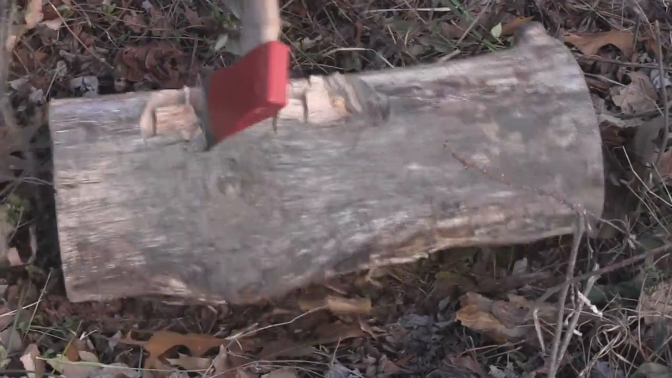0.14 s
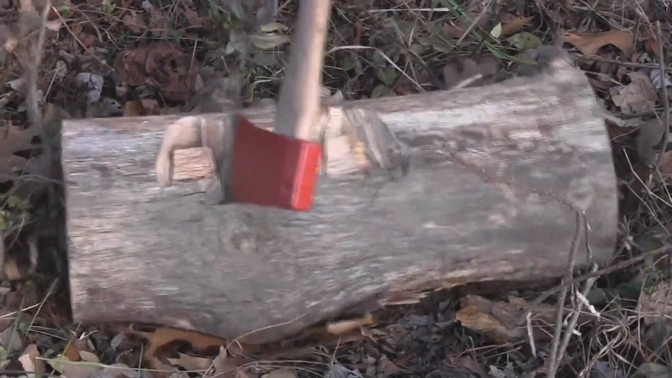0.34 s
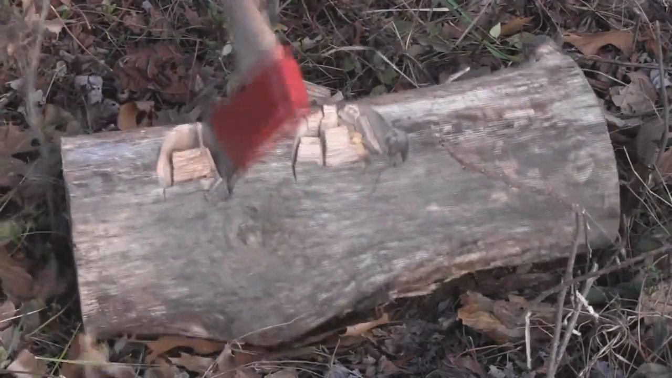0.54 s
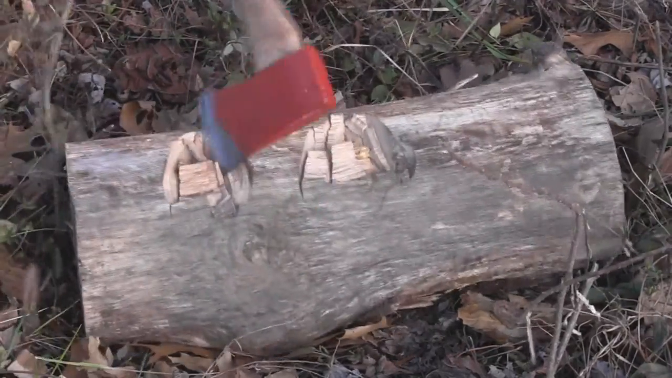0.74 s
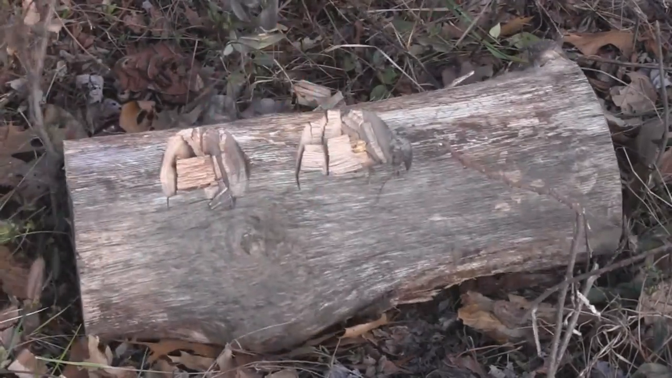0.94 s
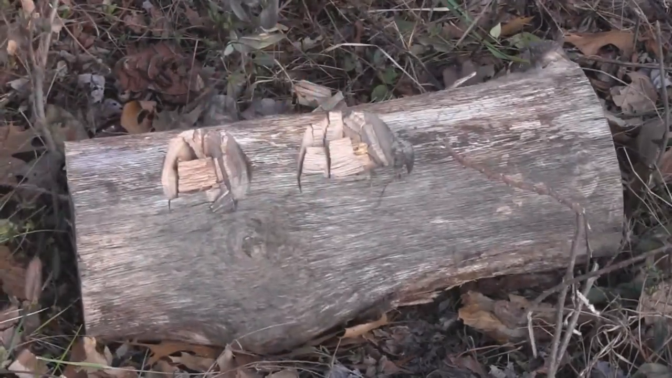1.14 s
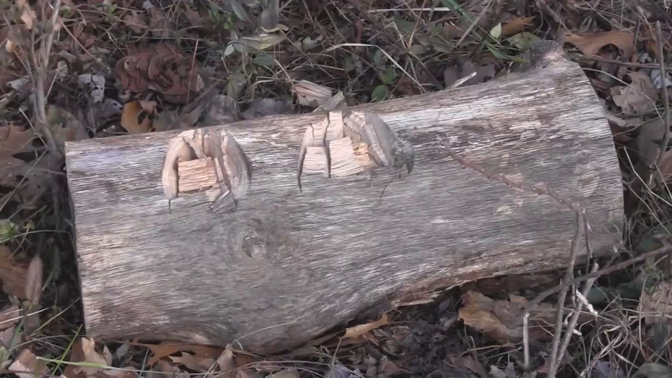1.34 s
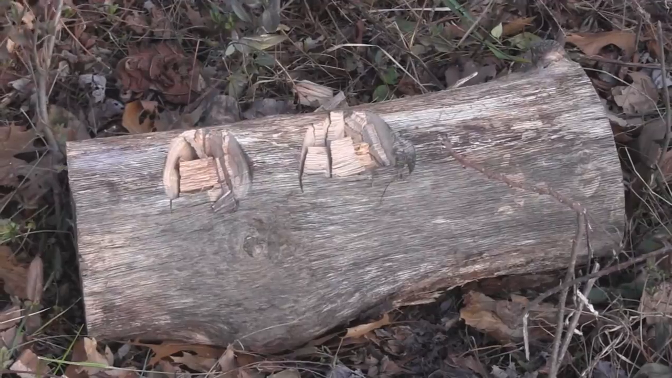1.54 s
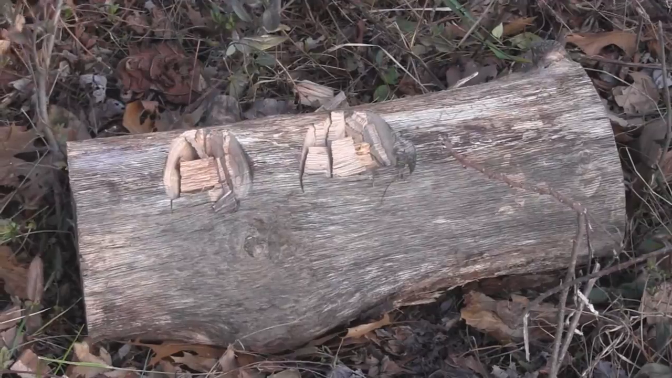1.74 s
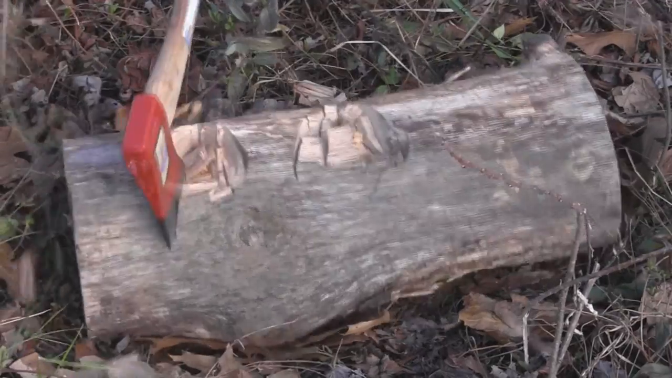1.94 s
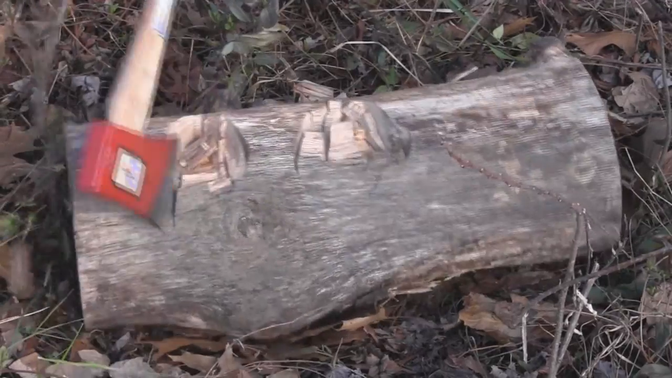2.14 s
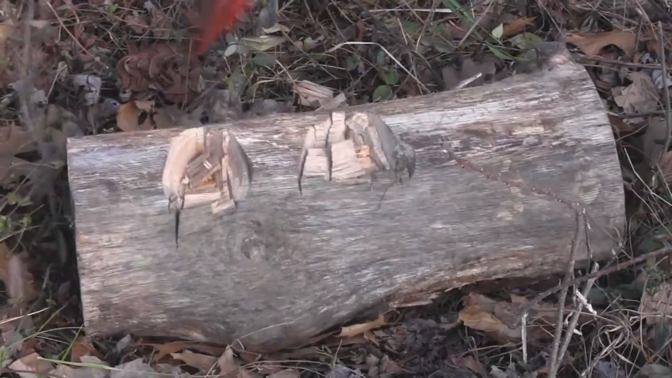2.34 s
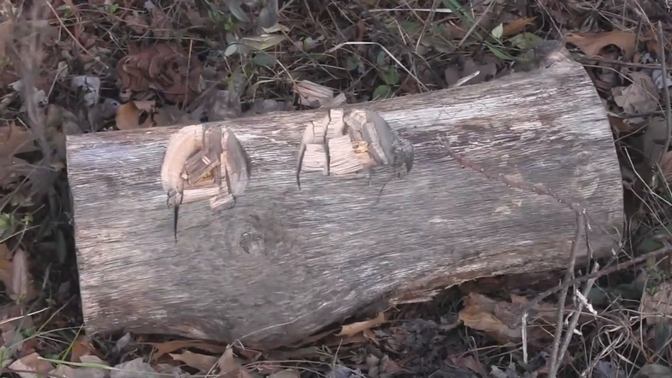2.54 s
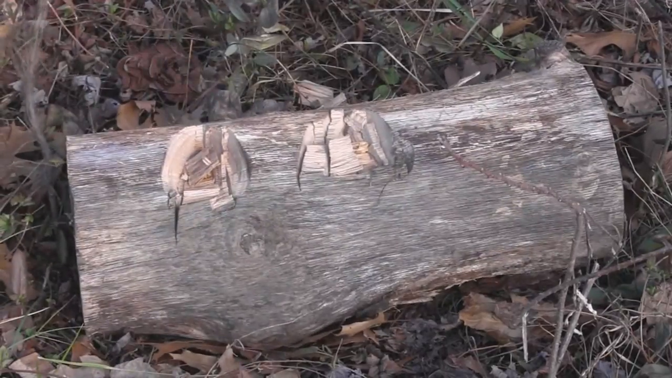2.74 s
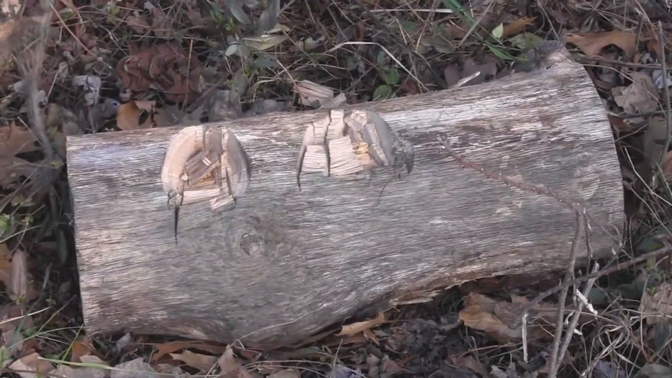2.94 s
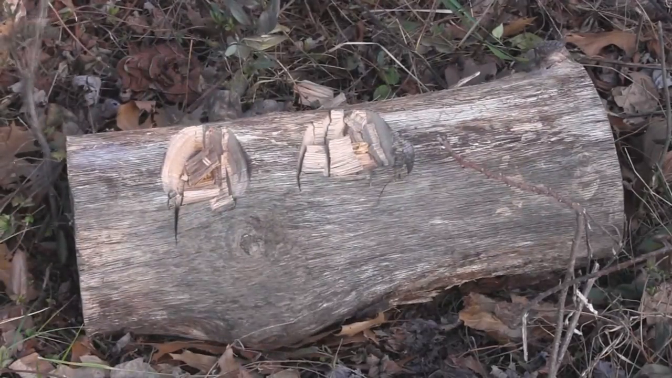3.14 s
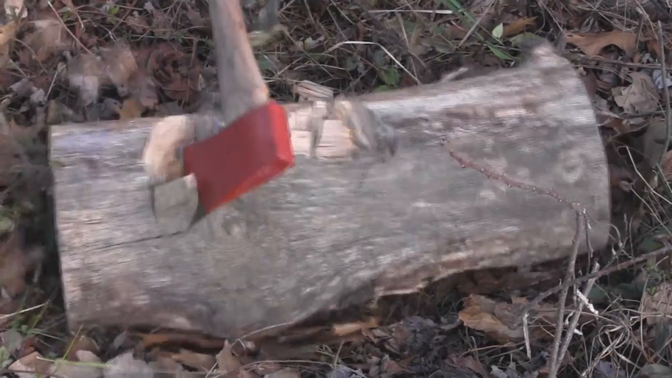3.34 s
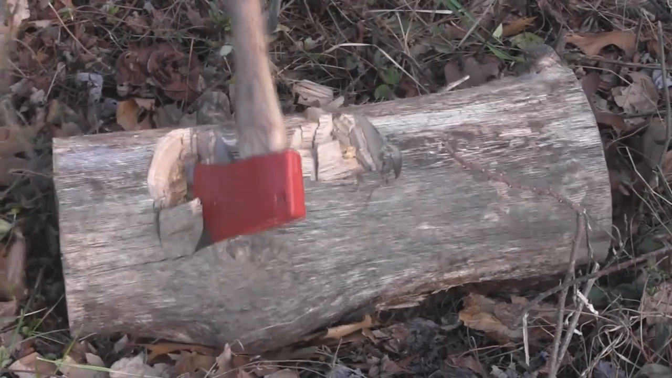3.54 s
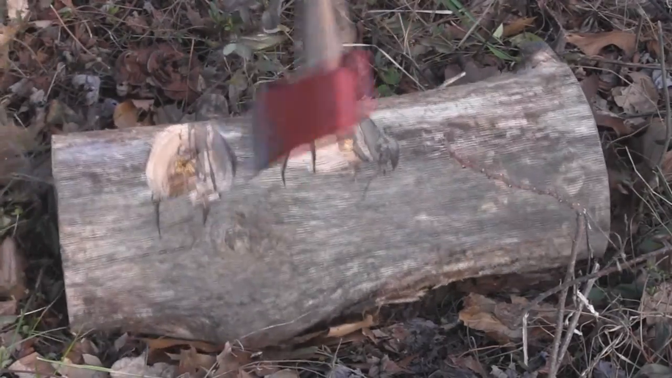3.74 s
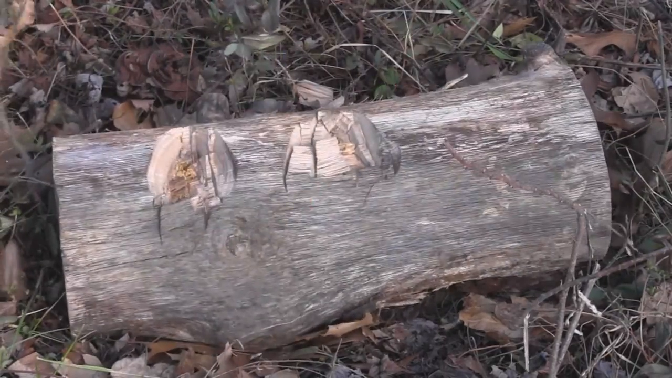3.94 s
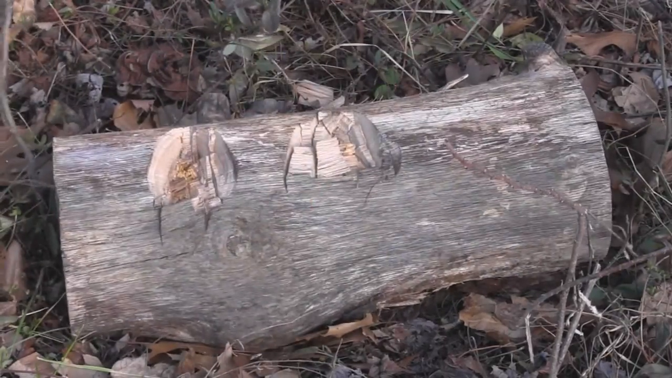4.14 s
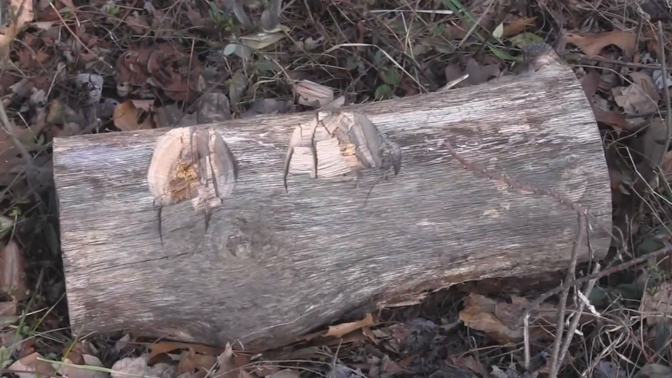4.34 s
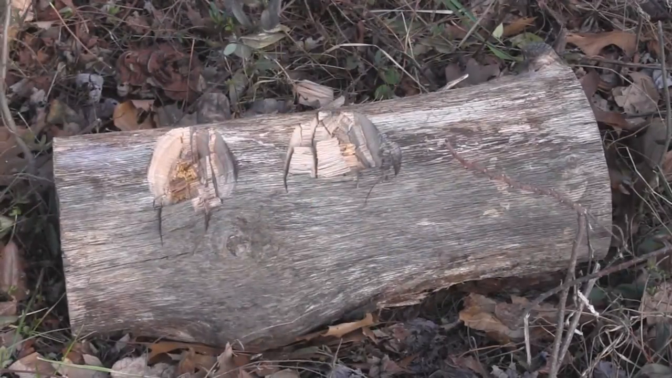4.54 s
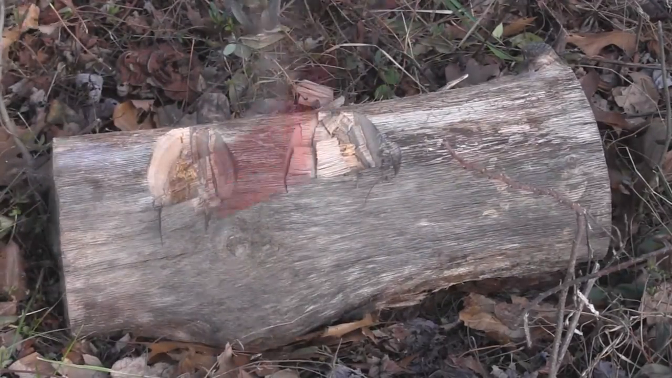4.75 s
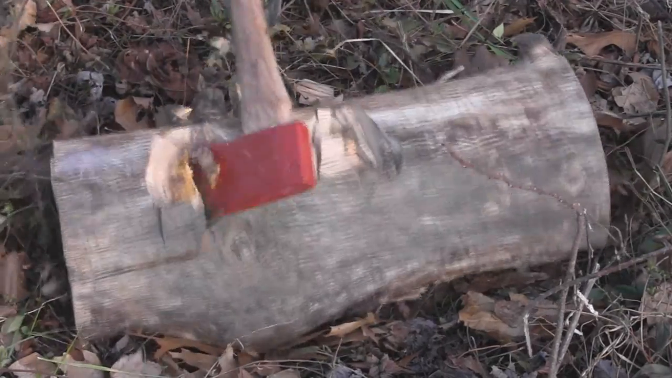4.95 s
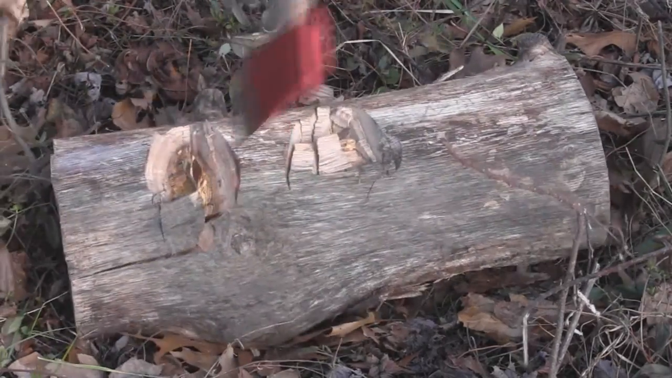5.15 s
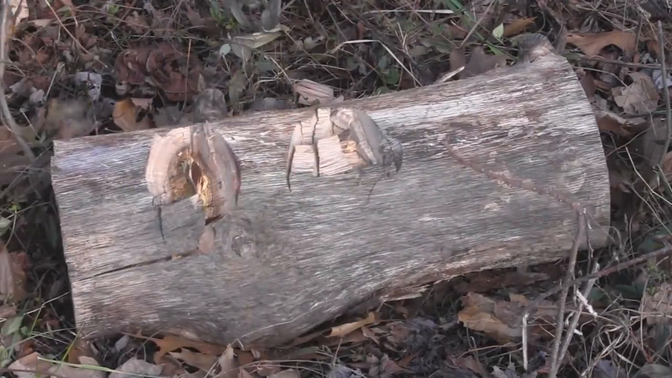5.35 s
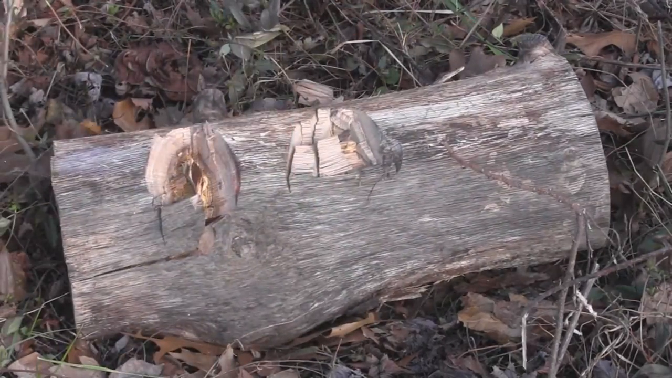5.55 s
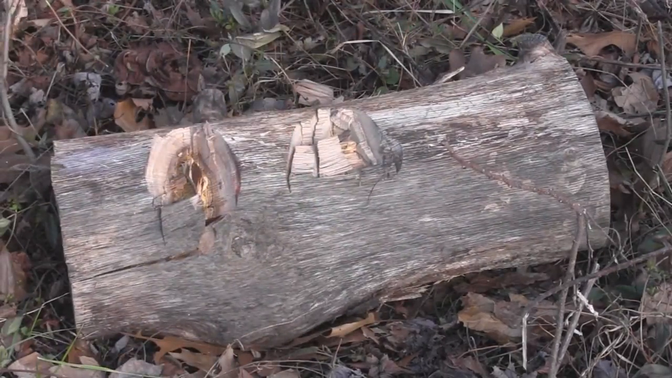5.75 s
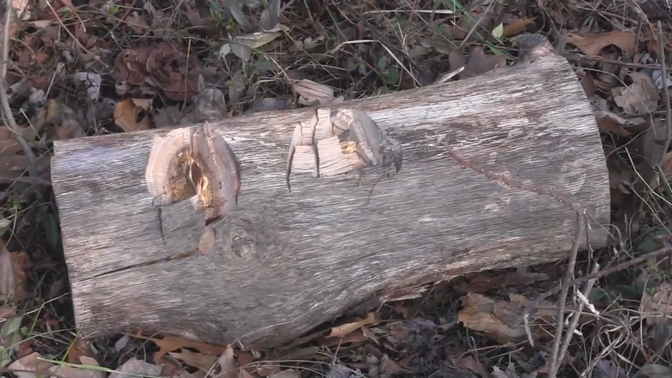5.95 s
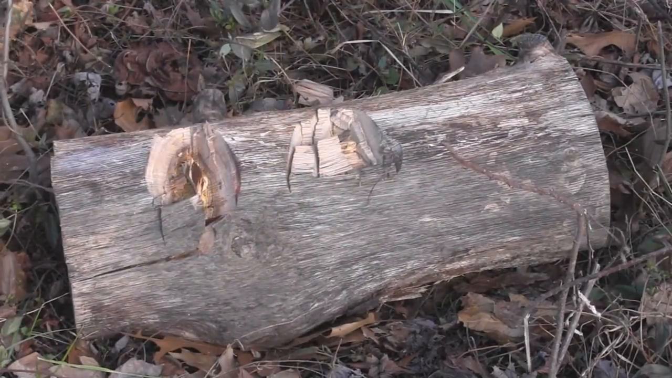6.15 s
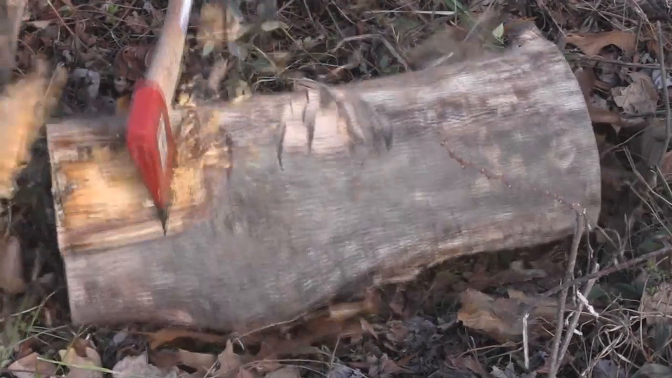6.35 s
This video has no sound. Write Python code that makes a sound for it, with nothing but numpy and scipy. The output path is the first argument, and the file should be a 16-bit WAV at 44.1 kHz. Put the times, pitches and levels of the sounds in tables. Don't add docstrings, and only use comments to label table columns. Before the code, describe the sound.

Close beside a log on dry leaves in a quiet wood, cloth and litter rustle and small twigs snap. An axe lands three short, hard woody chops, about one and a half seconds apart, the last hardest. Each splinters briefly and returns as a faint dull echo. Low puffs of air flutter on the microphone, which overloads slightly on the blows.

```python
import sys
import numpy as np
from scipy import signal
from scipy.io import wavfile
from scipy.ndimage import uniform_filter1d

SR = 44100
rng = np.random.default_rng(int(sys.argv[2]) if len(sys.argv) > 2 else 0)


def ratio_of_db(decibels):
    return 10 ** (np.asarray(decibels, float) / 20)


def wav_out(sig):
    wavfile.write(sys.argv[1], SR, np.round(np.clip(np.atleast_2d(sig).T, -1, 1) * 32767).astype(np.int16))


N = 282681

# frequency in Hz, level in dB.
AIR_COLOUR = [(18, -54), (30, -24), (120, -8), (424, 2), (566, -4), (755, -7), (1700, -10.5), (2330, -11),
              (8000, -18.5), (12200, -27.5), (15800, -47)]
# frequency in Hz, likeness from 0 to 1.
LIKENESS = [(60, 0.99), (150, 1.0), (380, 1.0), (950, 1), (2380, 0.82), (5980, 0.65), (15000, 0.56)]
# frequency in Hz, likeness from 0 to 1.
BUFFET_LIKENESS = [(30, .9995), (90, .9993), (140, .98), (250, .93), (640, .96), (1400, .98), (3000, .9)]
# frequency in Hz, level in dB per Hz.
BUFFET_COLOUR = [(12, -59), (20, -29), (38, -31), (128, -1.5), (232, -5), (348, -10.5), (480, -23.5),
                 (500, -27), (650, -42), (1100, -120)]
# peak in seconds, level in dB, seconds to rise 10 dB,
# seconds to fall 10 dB, upper part in dB.
GUSTS = [(.02, -40, .1, .1, 6), (.114, -35, .1, .03, .5), (.24, -45, .15, .2, 2),
         (.392, -31.5, .015, .26, 2.5), (1.09, -42, .3, .14, 1.5), (1.5, -46.5, .14, .07, .5),
         (2.1, -47, .03, .05, 9), (2.69, -51, .02, .09, -7), (2.94, -39, .03, .35, -4),
         (3.3, -30, .04, .15, -1.5), (3.455, -31, .15, .025, .5), (3.68, -34.5, .085, .1, 1.5),
         (3.87, -33, .015, .28, .5), (4.41, -31.5, .03, .21, -4), (4.93, -34, .08, .03, -6),
         (5.22, -28, .08, .12, -2.5), (5.35, -32, .08, .2, -3), (5.598, -29.5, .03, .05, -5.5),
         (5.79, -32, .2, .022, -5), (5.9, -46, .03, .6, -2.5)]
# frequency in Hz, level in dB per Hz.
RUSTLE_COLOUR = [(900, -20), (1500, -11), (2200, -2.5), (3000, -3.5), (7600, -3.5), (12000, -7.5),
                 (15800, -18)]
# peak in seconds, level in dB,
# seconds to rise 10 dB, seconds to fall 10 dB, treble in dB.
SWISHES = [(.078, -33, .035, .08, -7.5), (.2, -39, .1, .06, -7.5), (.36, -36, .16, .04, -6),
           (.475, -37, .075, .07, -4), (.66, -35.5, .11, .04, -6), (.8, -42.5, .13, .24, -5),
           (1.664, -44, .05, .05, -6), (1.91, -43.5, .11, .07, -8), (2.77, -51.5, .1, .1, -4),
           (3.05, -27, .085, .055, -4.5), (3.31, -32, .15, .12, -4.5), (3.632, -42, .08, .08, -9.5),
           (3.85, -49, .07, .2, -9), (4.525, -43, .07, .04, -5), (4.9, -47, .3, .06, -3.5),
           (5.12, -40, .075, .09, -8.5), (5.28, -42, .06, .15, -8), (5.49, -42, .02, .025, -4),
           (5.57, -39.5, .07, .06, -6.5), (5.658, -40, .015, .025, -11), (6.335, -46, .02, .05, -11)]
# start in seconds, level in dB,
# seconds to fall 10 dB, treble in dB.
SCUFFS = [
    (.708, -33, .025, -16),
    (2.0, -41, .25, -11),
    (2.216, -36, .16, -10),
    (2.612, -36.5, .045, 3),
    (4.068, -36, .075, -5.5),
    (4.345, -41, .018, 8),
    (4.597, -47, .04, 5),
    (5.73, -40, .06, -3),
    (5.948, -39.5, .03, -7),
    (6.22, -37, .02, -14),
]
# frequency in Hz, level in dB per Hz.
SHUFFLE_COLOUR = [(250, -23), (450, 5.5), (1000, 2), (1800, -5), (3000, -22.5)]
# peak in seconds, level in dB, seconds
# to rise 10 dB, seconds to fall 10 dB.
SHIFTS = [
    (.114, -42, .2, .04),
    (.35, -44, .35, .9),
    (2.04, -44, .015, .09),
    (2.236, -47, .3, .2),
    (3.63, -43, .02, .1),
    (3.68, -47, .2, .4),
    (4.99, -40, .01, .04),
    (5.09, -36.5, .02, .1),
    (5.598, -43, .04, .07),
]
# time in seconds, side level in dB.
SIDE_LEVEL = [(3.3, -3), (4.9, 8), (5.5, 12.5), (6.3, 9)]
# time in seconds, edge in Hz.
MONO_BELOW = [(.7, 2800), (1.2, 1300), (1.9, 1700), (2.2, 650), (2.85, 550), (3.15, 40)]
# start in seconds, peak in dB, pitch in Hz, left minus right in dB.
CLICKS = [(.0458, -24, 4040, -2), (.0668, -17, 4200, -3), (.258, -26, 6500, 0), (.3207, -24, 9000, 1),
          (.3793, -17, 1900, -1), (.579, -23, 5500, 0), (.3797, -17, 7600, -1), (.5725, -25, 8000, 0),
          (.7012, -24, 6500, 0), (.7303, -21, 3300, -1), (.7632, -24, 13000, 0), (.7692, -25, 6500, -1),
          (.7695, -27, 2500, -1), (.7835, -30, 4000, 0), (.8235, -28, 4500, 0), (1.1985, -19, 10500, 0),
          (2.2182, -23, 700, 1), (2.2788, -19, 9000, -2), (3.3447, -19, 9670, 2), (4.062, -27, 650, 5),
          (2.2443, -22, 5000, 0), (2.7733, -31, 5040, -4), (3.1978, -27, 4300, 1), (3.2966, -21, 3500, 1),
          (3.613, -29, 2200, 1), (3.6318, -26, 1700, 1), (3.652, -27, 1150, 1), (4.3308, -29, 7440, 5),
          (4.3467, -22, 12000, 9), (4.5138, -29, 4280, 2), (4.684, -36, 7910, 3), (5.076, -27, 6000, 0),
          (5.3398, -27, 4700, 3), (5.4311, -28, 3500, -1), (5.449, -29, 3740, -1), (5.534, -27, 3000, 0),
          (5.5345, -28, 1300, 0), (5.5433, -27, 2180, 3), (5.571, -26, 3500, 1), (5.578, -26, 3000, 1),
          (5.593, -26, 9000, 1), (5.605, -28, 1250, 1), (5.6165, -29, 7000, 0), (5.6411, -26, 11000, 1),
          (5.6531, -24, 2500, 3), (5.6575, -25, 1800, 3), (5.663, -28, 8300, 1), (5.6835, -27, 3500, 0),
          (5.684, -23, 9000, 0), (5.735, -23, 1400, 6), (4.9414, -3, 5500, 0), (4.949, -14, 6500, 0),
          (3.4774, -8, 5000, 0), (5.9309, -30, 8000, 8), (6.2195, -24, 500, 0)]
# start in seconds, peak in dB, ring in Hz,
# left minus right in dB, broad tick in dB.
SNAPS = [(.0665, -16, 6000, -7, -12), (.1974, -28, 6540, .3, -4), (.3791, -15.5, 1320, -5, -6),
         (.5786, -22, 2890, 1.2, -8), (.7093, -27, 3060, -4, -8), (.7292, -20.5, 3570, -2.5, -7),
         (2.217, -16, 2770, 2.5, -11), (2.2433, -24, 2500, 2.5, -4), (2.2784, -18, 4630, -2.5, -12),
         (2.383, -31, 3330, 3, -3), (2.446, -32, 3850, .3, -13), (3.2594, -22, 5960, .6, -12),
         (3.8355, -27, 700, 5, -10), (4.0618, -16, 3080, 7, -2.5), (4.347, -32, 7450, 15, -16),
         (5.252, -32, 1100, 11, 1.5), (5.5202, -28, 1900, 3, -5), (5.648, -26, 1010, 2.5, -4),
         (6.2192, -17, 1130, .3, -5)]
# start in seconds, peak in dB, ring in Hz, left minus right in dB.
TICKS = [(.32, -31, 1440, -1.2), (.7632, -35, 2340, -3), (.819, -36, 2700, -3), (1.1985, -41, 5200, 3),
         (2.613, -36, 9100, -18), (3.3443, -27, 3530, -1.2), (5.3006, -36, 2890, 9), (5.3398, -43, 1110, 6),
         (5.395, -35, 1200, 1.2), (5.4873, -35, 4570, -12), (5.8122, -39, 1230, 8),
         (5.8733, -38, 935, -2.5), (6.3344, -43, 1090, 3)]
# start in seconds, peak in dB, ring in Hz, left minus right in dB,
# broad tick in dB.
CHIPS = [
    (.9782, -27, 3390, -.6, -16),
    (5.727, -31, 1380, 9, -1),
    (5.9487, -32, 2460, 18.5, 2.5),
]
# start in seconds, peak in dB, ring in Hz,
# left minus right in dB, broad tick in dB.
SPLITS = [
    (1.9868, -17, 700, 0, -14),
    (3.4836, -14, 1900, 0, -4),
    (4.9484, -9, 1350, 0, -8),
]
# start in seconds, peak in dB, pitch in Hz,
# seconds to fall 60 dB, left minus right in dB.
BUMPS = [(0.093, -17, 133, 0.058, .3), (0.375, -23, 217, 0.052, .3), (0.519, -15, 200, 0.045, .3),
         (1.48, -35, 366, 0.048, .3), (2.923, -30, 145, 0.04, .3), (3.434, -15.5, 346, 0.038, .3),
         (3.856, -21, 400, 0.025, 3), (3.864, -9, 290, 0.02, 3), (3.874, -17, 270, 0.03, 3),
         (4.396, -24, 320, .04, 3), (5.157, -24, 160, .06, 2), (5.207, -22, 170, .05, 2),
         (5.24, -23, 150, .04, 2), (5.303, -23, 190, .05, 3), (5.366, -22, 160, .05, 3),
         (3.675, -20, 210, .04, 1), (3.684, -20, 200, .04, 1), (5.592, -14, 122, 0.053, 4)]
# start in seconds, force in dB, splinter crack in dB,
# seconds for the crack to fall 60 dB, ground thump in dB.
BLOWS = [
    (1.9706, 1, -5.5, .012, -42),
    (3.4772, -.7, -9, 0.028, -31),
    (4.9414, 4.5, -7.5, 0.014, -28),
]
# pitch in Hz, level in dB, seconds to swell,
# seconds driven by the blade, seconds to fall 60 dB.
RINGS_FIRST = [(523, -9, 0.0066, .004, 0.0087), (640, -5.5, 0.0013, 0.0035, 0.023),
               (904, -2.8, 0.0019, 0.00082, .012), (1280, -4.5, 0.0023, 0.00079, 0.016),
               (1530, -14.5, 0.0039, .002, 0.01), (1884, -11, 0.00048, .003, 0.013),
               (2830, -16, 0.00044, 0.0016, 0.0082), (4180, -6, 0.0005, 0.0022, 0.0053),
               (7080, -11.5, .0006, .002, 0.0049), (11240, -19.5, .0005, .001, .008)]
# pitch in Hz, level in dB, seconds to swell, seconds driven, seconds to fall 60 dB.
RINGS_SECOND = [(726, -.3, 0.0011, 0.0035, 0.024), (850, -8, 0.00074, 0.0045, 0.025),
                (1200, -3.5, 0.00079, 0.0032, 0.008), (1555, -10.5, 0.0013, .003, 0.016),
                (2340, -26, 0.0013, .002, 0.03), (3500, -17, 0.00023, 0.0015, 0.018),
                (4350, -10, 0.00031, 0.0012, 0.007), (5930, -17, 0.00044, 0.0011, 0.0083)]
# pitch in Hz, level in dB, seconds to swell, seconds driven, seconds to fall 60 dB.
RINGS_THIRD = [(718, -3, 0.0009, 0.0042, 0.013), (850, -5.5, 0.0008, 0.003, 0.014),
               (997, -6.5, 0.0008, 0.0024, 0.0082), (1202, -8.5, 0.0003, 0.008, 0.011),
               (1362, -8, 0.0003, 0.0085, 0.0064), (1720, -14, .0004, .003, .01),
               (2310, -14.5, 0.00073, 0.0027, .012), (2757, -14, .0005, 0.0027, 0.02),
               (3920, -13.5, 0.00025, 0.0029, 0.0074)]
# frequency in Hz, level in dB.
CRACK_COLOUR = [(300, -56), (1000, 7.5), (2000, 8), (4000, 3), (8000, -2), (13000, -9), (16000, -13.5)]
# delay in seconds, level in dB, middle in Hz, width in Hz.
ECHOES = [
    (.0125, -26, 740, 610),
    (.0175, -25, 700, 500),
    (.0512, -22, 595, 250),
    (.069, -34, 600, 260),
    (.107, -36, 630, 260),
    (.122, -33, 620, 260),
    (.1322, -13, 615, 330),
    (.15, -30, 745, 600),
]
# frequency in Hz, level in dB.
SCATTER_COLOUR = [(250, -20), (550, 1.5), (800, -4), (1300, -3), (2200, -1), (4100, -6), (12000, -16)]
# frequency in Hz, seconds to fall 60 dB.
SCATTER_T60 = [(100, 0.55), (600, 0.44), (1500, 0.1), (4000, 0.45), (12000, 0.3)]


def evened(x):
    return x / np.sqrt(np.mean(x ** 2) + 1e-20)


def read(points, hz):
    f, value = np.transpose(points)
    return np.interp(np.log(hz + 1), np.log(f + 1), value)


def add(mix, s, sound):
    part = mix[..., round(s * SR):][..., :sound.shape[-1]]
    part += sound[..., :part.shape[-1]]


def panned(db, left_minus_right_db):
    return ratio_of_db(db + np.array([[1], [-1]]) * left_minus_right_db / 2)


def coloured(x, points):
    log_gain = np.log(ratio_of_db(read(points, abs(np.fft.fftfreq(4096, 1 / SR)))))
    taps = np.fft.ifft(np.exp(np.conj(signal.hilbert(log_gain)))).real[:2048]
    return signal.oaconvolve(x, taps)[:len(x)]


def noise(points, same, size, patchy_db, flicker_db, lift_db=0):
    frames, hz = 4 * N // size + 5, np.fft.rfftfreq(size, 1 / SR)
    a, b, c, d, patches = rng.standard_normal((frames, len(hz), 5)).T
    patches = uniform_filter1d(patches, size // 64, 0)
    patches = evened(uniform_filter1d(patches, 8192 // size, 1))
    flicker = evened(uniform_filter1d(rng.standard_normal(frames), size=3))
    like = np.clip(read(same, hz), 0, 1)[:, None]
    mid = a + 1j * b
    side = np.sqrt((1 - like) / (1 + like)) * (c + 1j * d)
    level_db = read(points, hz)[:, None] + patchy_db * patches + flicker_db * flicker + lift_db
    bins = np.array([mid + side, mid - side]) * ratio_of_db(level_db)
    return evened(signal.istft(bins, nperseg=size, noverlap=size * 3 // 4)[1][:, :N])


def swell(t, s, db, rise, fall, roundness=1):
    return db - 10 * np.where(t < s, (s - t) / rise, (t - s) / fall) ** roundness


def blend(levels_db, colours_db):
    power = ratio_of_db(2 * np.maximum(levels_db, -150))
    return 10 * np.log10(power.sum(0)), np.dot(colours_db, power) / power.sum(0)


def tilt(control, usual_db, size, from_hz):
    upper = np.clip(np.log2(np.fft.rfftfreq(size, 1 / SR) / from_hz + 1e-3), 0, 1)
    frame_s = np.arange(4 * N // size + 5) * size / 4 / SR
    return upper[:, None] * (control(frame_s)[1] - usual_db)


def air():
    return ratio_of_db(-45) * noise(AIR_COLOUR, LIKENESS, size=1024, patchy_db=0.37, flicker_db=1.95)


def gusts(t):
    calm_db, calm_upper_db = -62, -1.5
    levels = [swell(t, *row[:-1]) for row in GUSTS] + [calm_db + 0 * t]
    return blend(levels, [row[-1] for row in GUSTS] + [calm_upper_db])


def buffet(gust_db):
    lift_db = tilt(gusts, usual_db=-2.1, size=1024, from_hz=130)
    puffs = noise(BUFFET_COLOUR, BUFFET_LIKENESS, size=1024, patchy_db=1.5, flicker_db=3.5, lift_db=lift_db)
    return ratio_of_db(gust_db - 0.2) * puffs


def movement(t):
    still_db, still_treble_db = -54.5, -1.5
    levels = [swell(t, *row[:-1], roundness=1.6) for row in SWISHES]
    levels += [swell(t, s, db, .003, fall) for s, db, fall, _ in SCUFFS]
    trebles = [row[-1] for row in [*SWISHES, *SCUFFS]]
    return blend(levels + [still_db + 0 * t], trebles + [still_treble_db])


def crackle():
    clumps = ratio_of_db(4.0 * evened(uniform_filter1d(rng.standard_normal(N), size=600)))
    sizes = ratio_of_db(4.6 * np.minimum(rng.exponential(1, N), 2.6))
    grains = sizes * (rng.random(N) < 700 * clumps / SR)
    kind, place = rng.integers(0, 12, N), rng.uniform(-0.46, 0.15, N)
    out = np.zeros((2, N))
    for k, hz in enumerate(np.geomspace(1500, 12000, num=12)):
        turns = np.arange(200) * hz / SR
        grain = np.sin(2 * np.pi * turns) * np.exp(-turns / 0.6) * ratio_of_db(read(RUSTLE_COLOUR, hz)) * hz
        hits = grains * (kind == k) * (1 + np.outer([1, -1], place))
        out += signal.oaconvolve(hits, grain[None])[:, :N]
    return evened(out)


def rustle(level_db):
    lift_db = tilt(movement, usual_db=-2.0, size=256, from_hz=4500)
    hiss = noise(RUSTLE_COLOUR, LIKENESS, size=256, patchy_db=2.0, flicker_db=1.6, lift_db=lift_db)
    return ratio_of_db(level_db + 2.0) * (hiss + 0.6 * crackle())


def shuffle(t, gust_db, rustle_db):
    stirred = ratio_of_db(-50.5 + .14 * (gust_db + 45) + .12 * (rustle_db + 45))
    shaken = np.linalg.norm([ratio_of_db(swell(t, *row)) for row in SHIFTS], axis=0)
    litter = noise(SHUFFLE_COLOUR, BUFFET_LIKENESS, size=512, patchy_db=0.6, flicker_db=1.0)
    return ratio_of_db(3.0) * np.hypot(stirred, shaken) * litter


def widened(x):
    s, db = np.transpose(SIDE_LEVEL)
    side = (x[0] - x[1]) / 2 * ratio_of_db(np.interp(np.arange(N) / SR, s, db))
    return x.mean(0) + np.outer([1, -1], side)


def clicks():
    out, t = np.zeros((2, N)), np.arange(1500) / SR
    creak = [(.7088 + k * .0019, -18 - .6 * k, 3300, -.4) for k in range(6)]
    rows = [*CLICKS, *creak]
    for (s, db, hz, pan_db), dust in zip(rows, rng.standard_normal((len(rows), 2, len(t)))):
        cycles = np.sin(2 * np.pi * hz * t) * np.exp(-hz * t)
        dust = evened(signal.oaconvolve(dust + dust.sum(0), cycles[None])[:, :len(t)])
        add(out, s, panned(db, pan_db) * (cycles + dust * ratio_of_db(-14 - 60 * t / .025)))
    return out


def snaps():
    out, t = np.zeros((2, N)), np.arange(3000) / SR
    rows = [(*row, .016 * ratio_of_db(-.25 * (row[1] + 25))) for row in [*SNAPS, *SPLITS]]
    rows += [(*row, 8, .017) for row in TICKS]
    rows += [(*row, .045) for row in CHIPS]
    grit = rng.standard_normal((len(rows), 4, len(t)))
    for (s, db, hz, pan_db, tick_db, t60), (wobble, shared, left, right) in zip(sorted(rows), grit):
        wobble = evened(uniform_filter1d(wobble, size=25))
        turns = np.cumsum(hz * (1 + 0.0018 / t60 * wobble)) / SR
        ring = np.sin(2 * np.pi * turns) * ratio_of_db(-60 * t / t60)
        ears = [signal.lfilter([1, -.5], 1, shared + 0.3 * own) for own in (left, right)]
        tick = evened(np.array([coloured(ear, CRACK_COLOUR) for ear in ears]))
        settling = ratio_of_db(tick_db - 24.5 - 60 * t / .1)
        both = ring + tick * (ratio_of_db(tick_db - 3 - 75 * t / t60) + settling)
        add(out, s, panned(db, pan_db) * both * np.minimum(t / 0.00037, 1))
    return out


def bumps():
    out, t = np.zeros((2, N)), np.arange(4000) / SR
    for s, db, hz, t60, pan_db in BUMPS:
        cycles = sum(np.sin(2 * np.pi * k * hz * t * (1 - 3 * t)) / k for k in (1, 1.7))
        add(out, s, panned(db - 60 * t / t60, pan_db) * np.minimum(t / 0.0051, 1) * cycles)
    return out


def blow(row, rings):
    s, force_db, crack_db, crack_t60, thump_db = row
    t = np.arange(SR // 8) / SR
    wood = np.zeros(len(t))
    for hz, db, swell_s, driven_s, t60 in rings:
        level = ratio_of_db(db - 60 * np.maximum(t - swell_s - driven_s, 0) / t60)
        wood += level * np.minimum(t / swell_s, 1) * np.sin(2 * np.pi * hz * t)
    shared, left, right = rng.standard_normal((3, len(t))) * ratio_of_db(2.05 * rng.exponential(1, len(t)))
    fibres = evened(np.array([coloured(shared + 0.4 * own, CRACK_COLOUR) for own in (left, right)]))
    fading = ratio_of_db(crack_db - 60 * t / crack_t60) + ratio_of_db(crack_db - 13 - 60 * t / 0.094)
    crack = fibres * fading * np.minimum(t / 0.0004, 1)
    thump = ratio_of_db(thump_db) * np.sin(np.pi * np.clip(t / 0.0107, 0, 1)) ** 2
    return s, panned(force_db, -.6) * (wood + crack + thump)


def single_echoes(x):
    out = np.zeros((2, N))
    for k, (delay, db, hz, width_hz) in enumerate(ECHOES):
        edges = [hz - width_hz / 2, hz + width_hz / 2]
        band = signal.butter(3, edges, "band", fs=SR, output="sos")
        add(out, delay, panned(db, (-1) ** k) * signal.sosfilt(band, x))
    return out


def trunk_scatter(x):
    taps = np.zeros((2, SR // 2))
    slots = np.arange(400, SR // 2 - 20, 20)
    at = slots + rng.integers(0, 20, (2, len(slots)))
    np.put_along_axis(taps, at, rng.choice([-1., 1.], at.shape), 1)
    taps += 0.3 * taps.sum(0)
    hz, t, z = signal.stft(taps, SR, nperseg=256)
    far_bank = (t > .14) * ratio_of_db(-60 * (t - .14) / 0.41)
    fading = ratio_of_db(-60 * t / read(SCATTER_T60, hz)[:, None]) + far_bank
    tail = signal.istft(z * fading, SR, nperseg=256)[1]
    tail = tail / np.linalg.norm(tail[0])
    return ratio_of_db(-27.5) * signal.fftconvolve(coloured(x, SCATTER_COLOUR)[None], tail, axes=1)[:, :N]


def narrowed(x):
    hz, t, side = signal.stft((x[0] - x[1]) / 2, SR, nperseg=1024)
    edge_hz = np.interp(t, *np.transpose(MONO_BELOW))
    side = side / (1 + (edge_hz / (hz[:, None] + 1)) ** 10)
    side = signal.istft(side, SR, nperseg=1024)[1][:N]
    return x.mean(0) + np.outer([1, -1], side)


def scene():
    t, axe = np.arange(N) / SR, np.zeros((2, N))
    rustle_db, gust_db = movement(t)[0], gusts(t)[0]
    low = widened(shuffle(t, gust_db, rustle_db) + buffet(gust_db))
    around = air() + low + rustle(rustle_db) + clicks() + snaps() + bumps()
    for row, rings in zip(BLOWS, (RINGS_FIRST, RINGS_SECOND, RINGS_THIRD)):
        add(axe, *blow(row, rings))
    struck = axe.mean(0)
    echoes = single_echoes(struck) + trunk_scatter(struck)
    return axe + narrowed(echoes + panned(0, .6) * around)


def roll_off(x):
    return signal.sosfilt(signal.butter(12, 15960, fs=SR, output="sos"), x)


def record(dry):
    dry = signal.sosfilt(signal.butter(2, 55, "high", fs=SR, output="sos"), dry)
    power_db = 10 * np.log10(signal.lfilter([.01], [1, -.99], (dry ** 2).mean(0)) + 1e-12)
    recovery = np.arange(N) * 188.0 / SR
    held_db = np.maximum.accumulate(power_db + recovery) - recovery
    over_db = np.maximum(held_db + 8, 0)
    ducked = dry / ratio_of_db(.45 * signal.lfilter([.005], [1, -.995], over_db))
    return roll_off(np.clip(ducked, -.98, .98))


dry = scene()
out = record(dry)
wav_out(out)
```